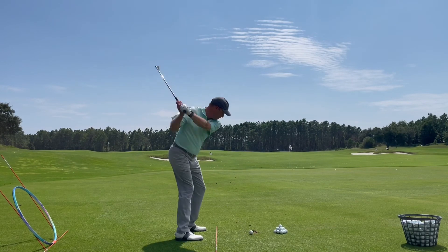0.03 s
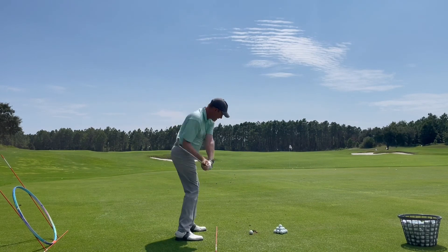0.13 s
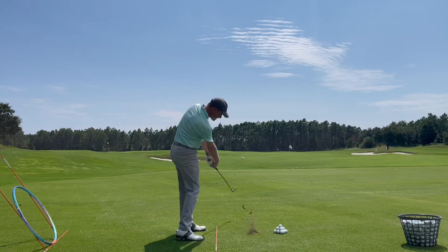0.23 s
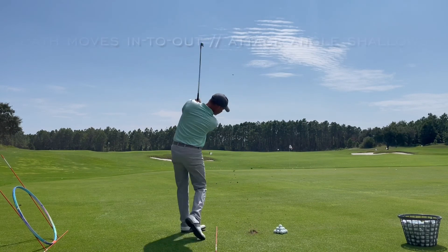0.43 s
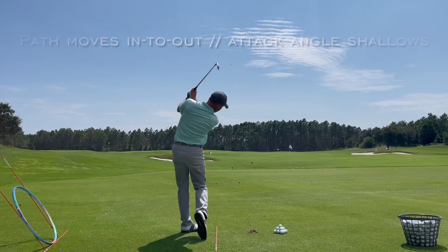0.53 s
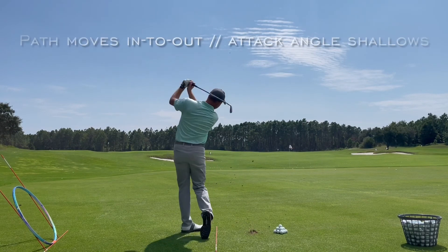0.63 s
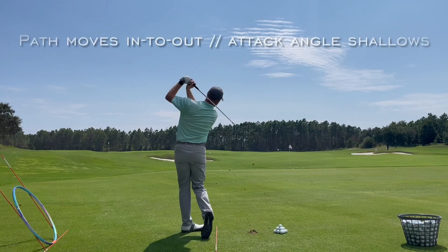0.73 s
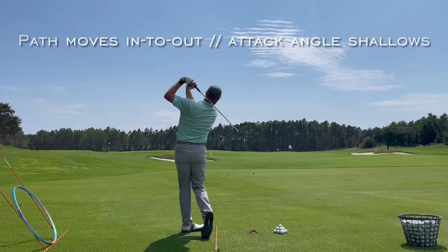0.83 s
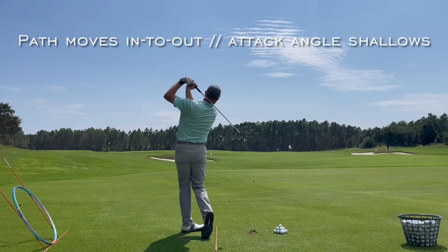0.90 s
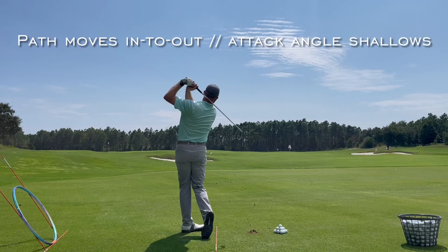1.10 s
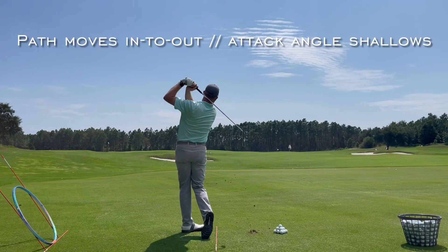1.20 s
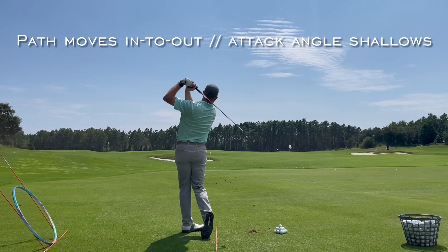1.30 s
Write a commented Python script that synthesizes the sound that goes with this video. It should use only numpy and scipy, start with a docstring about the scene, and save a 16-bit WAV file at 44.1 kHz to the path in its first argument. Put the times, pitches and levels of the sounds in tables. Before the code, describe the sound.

A golf iron hits a ball: a brief airy swish with a rising whistle swells from about 0.12 s into one loud, sharp crack at 0.21 s, with crunching turf and a short low thump. Grainy soil sprays until 0.3 s, and soft echoes fade across the open field. Low wind rumble and hiss continue, with faint cricket pulses, tiny bird chirps near 1 s and a faint tick at 1.33 s.

```python
"""Golf shot on an open range

A golf iron swishes down as shaped noise with a rising whistle, and cracks a ball off the turf: pulses,
short resonances and a burst of crunch. A sagging low tone thumps, grainy puffs of grass and soil spray,
and noise fading band by band, with soft echoes, is the open field. Wind rumbles on the microphone under
distant hiss; a cricket pulses as bursts of noise, far birds are gliding tones, and one faint tick ends it."""
import sys
import numpy as np
from scipy import signal
from scipy.fft import rfft, irfft
from scipy.io import wavfile

SR = 44100
rng = np.random.default_rng(int(sys.argv[2]) if len(sys.argv) > 2 else 0)


def materialize(psi):
    """Save the field psi as 16-bit PCM at rate SR to the path in sys.argv[1].

    A 1-D psi becomes a single channel; in a 2-D psi each row is a channel.
    """
    bounded = np.clip(np.atleast_2d(psi).T, -1, 1)
    quanta = np.round(bounded * 32767).astype(np.int16)
    wavfile.write(sys.argv[1], SR, quanta)


N = 59535
T = np.arange(N) / SR
HZ = np.fft.rfftfreq(N, 1 / SR)
IMPACT_S = .2101
SWING_FULL_S = .17  # when the swish is full at 1 kHz

# Likeness of the two channels for sound from all around, ahead of the ports.
# Each row: frequency in Hz, likeness from 0 to 1.
SURROUND_LIKENESS = [(130, 0.48), (450, 0.19), (1100, 0.082), (1900, 0.94), (5500, 0.36), (7500, 1),
                     (16000, 0.97)]
# Colour of the crack coming back off the open ground. Each row: frequency in Hz, relative level in dB per Hz.
FIELD_COLOUR = [(120, 12.5), (250, 5.5), (500, 1), (1200, -3.5), (2500, -5), (6500, -5.5), (8500, -8.5),
                (11500, -11.5), (14000, -18.5), (16000, -26)]


def amp(db):
    """Decibels to gain."""
    return 10 ** (np.asarray(db) / 20)


def unit(x):
    """Scales to rms 1."""
    return x / np.sqrt(np.mean(x ** 2) + 1e-20)


def read(points, hz):
    """Joins points by straight lines over log frequency."""
    f, value = np.transpose(points)
    return np.interp(np.log(hz + 1), np.log(f + 1), value)


def noise(spectrum, likeness):
    """Two channels of coloured noise, rms 1, as alike as the likeness table says."""
    shared, apart = rfft(rng.standard_normal((2, N)))
    c = np.clip(read(likeness, HZ), 0, 1)
    pair = np.sqrt(1 + c) * shared + np.sqrt(1 - c) * np.array([apart, -apart])
    return unit(irfft(pair * amp(read(spectrum, HZ)), N))


def drift(seconds):
    """Random wander of rms 1; more seconds make it slower."""
    return unit(irfft(rfft(rng.standard_normal(N)) * np.exp(-(HZ * seconds) ** 2), N))


def strike(start, rise, t60):
    """Envelope of a quick rise and an exponential fall of 60 dB in t60 seconds."""
    age = np.maximum(T - start, 0)
    return (1 - np.exp(-age / rise)) * amp(-60 * age / t60)


def swell(s, db, half):
    """Envelope of a smooth rise and fall."""
    return amp(db) * np.exp(-((T - s) / half) ** 2)


def by_band(x, envelope):
    """Splits sound into overlapping bands and gives each its own envelope(centre Hz)."""
    centres = np.geomspace(125, 16000, 8)
    spectrum = rfft(x)
    total = 0
    for hz, share in zip(centres, np.eye(len(centres))):
        weight = read(list(zip(centres, share)), HZ)
        total = total + irfft(spectrum * weight, N) * envelope(hz)
    return total


def ports(x):
    """Sound reaches the two microphone ports with different phase and level."""
    # Each row: frequency in Hz, lead of left over right in radians.
    port_phase = [(100, 0), (400, -.2), (750, .3), (1600, .25), (2400, .6), (5100, .4), (6700, -1.1),
                  (8150, -3.14), (11400, -6.28), (14300, -9), (16500, -9.8)]
    # Each row: frequency in Hz, left minus right in dB.
    port_balance = [(110, -1.5), (200, -2), (400, 2), (720, -3), (1200, 2), (1600, 0), (4400, 3),
                    (8100, .4), (15000, -.5)]
    phase, balance = read(port_phase, HZ), read(port_balance, HZ)
    left = amp(balance / 2) * np.exp(.5j * phase)
    right = amp(-balance / 2) * np.exp(-.5j * phase)
    return irfft(rfft(x) * np.array([left, right]), N)


def outdoors():
    """Gusty wind rumble, stronger on the right, under the slowly wandering hiss of distant trees."""
    # Colour of the rumble. Each row: frequency in Hz, relative level in dB per Hz.
    wind_colour = [(15, -28.5), (30, -13), (50, -3), (80, -0.5), (135, -3.5), (200, -9), (300, -24.5),
                   (600, -43), (2000, -70.5)]
    # Course of the rumble. Each row: time in seconds, level in dB before the trim and gusts.
    wind_course = [(0.0, -60), (0.124, -51.5), (0.15, -56.5), (0.24, -50.5), (0.326, -52.5), (0.365, -47),
                   (0.44, -53.5), (.65, -54.5), (.75, -53.5), (0.935, -54.5), (0.972, -50), (1.01, -55.5),
                   (1.17, -56.5), (1.21, -54), (1.35, -56)]
    # Colour of the hiss. Each row: frequency in Hz, relative level in dB per Hz.
    air_colour = [(100, 1), (400, 0.5), (900, -3.5), (1600, -18), (2500, -14.5), (4000, -13.5), (5300, -16),
                  (7000, -15), (8500, -13.5), (9800, -23), (11500, -35.5), (16000, -40)]
    # Course of the hiss. Each row: time in seconds, level in dB before wander and balance.
    air_course = [(0, -63.5), (.3, -62.5), (.75, -64), (.92, -64.5), (1.02, -65.5), (1.1, -63.5),
                  (1.18, -65), (1.27, -64.5), (1.35, -63.5)]
    wind_trim_db, gust_db, wind_likeness = 3.5, 0.34, 0.62
    air_wander_db = 1.15
    wind_right_db, air_right_db = 4, -1.1  # right minus left

    wind_db = wind_trim_db + np.interp(T, *np.transpose(wind_course)) + gust_db * drift(.08)
    wind = amp(wind_db) * noise(wind_colour, [(0, wind_likeness)])
    air_db = np.interp(T, *np.transpose(air_course))
    # each band of the hiss wanders by itself
    air = by_band(noise(air_colour, SURROUND_LIKENESS), lambda hz: amp(air_db + air_wander_db * drift(0.2)))
    side = np.array([[-.5], [.5]])  # left, right
    return wind * amp(side * wind_right_db) + ports(air) * amp(side * air_right_db)


def swing(hz):
    """Level of the air noise: swells with club speed, treble last, and stops at the ball."""
    rise_s, stop_s = .026, 0.0095
    lag_s = .006  # each octave above 1 kHz swells this much later
    early = np.maximum(SWING_FULL_S + lag_s * np.log2(hz / 1000) - T, 0)
    return np.exp(-(early / rise_s) ** 2 - np.maximum(T - IMPACT_S, 0) / stop_s)


def swish():
    """Turbulence round the head and a rising vortex tone from the shaft."""
    # Colour of the turbulence. Each row: frequency in Hz, relative level in dB per Hz.
    swish_colour = [(100, -22), (280, -8), (450, 0.5), (900, -2), (1600, -4.5), (2500, -5), (3500, -9.5),
                    (6000, -11.5), (7400, -16), (9500, -17.5), (11500, -21.5), (14000, -26.5), (16000, -28)]
    # Likeness of the channels for sound from the tee. Each row: frequency in Hz, likeness from 0 to 1.
    tee_likeness = [(200, .8), (900, .9), (2000, .9), (5500, 0), (7500, 0.94), (16000, 0.98)]
    swish_db, whistle_db = -43, -45.5
    whistle_hz, rise_hz_per_s = 483.8, 3200  # pitch at full swing and its climb
    waver_hz = 35  # rms

    turbulence = by_band(noise(swish_colour, tee_likeness), swing)
    pitch = whistle_hz + rise_hz_per_s * np.clip(T - SWING_FULL_S, -.1, .1)
    tone = np.sin(2 * np.pi * np.cumsum(pitch + waver_hz * drift(0.0036)) / SR)
    return amp(swish_db) * turbulence + amp(whistle_db) * tone * swing(whistle_hz)


def contact(start, db, hz, octaves):
    """One short pressure pulse: a band round its centre, with energy packed early by minimum phase."""
    f = abs(np.fft.fftfreq(2048, 1 / SR)) + 1
    log_gain = np.maximum(2 * (1 - np.hypot(1, np.log2(f / hz) / octaves)), -10)
    pulse = np.fft.ifft(np.exp(np.conj(signal.hilbert(log_gain)))).real
    spectrum = rfft(pulse / np.linalg.norm(pulse), N)
    delay = np.exp(-2j * np.pi * HZ * start)
    return amp(db) * irfft(spectrum * delay, N)


def mode(hz, db, t60):
    """One resonance that swells while the club bites and then dies in hundredths of a second."""
    peak_s, rise_s = .21175, 0.0017
    centre_hz, lag_s = 1610, .00057  # each octave below the centre peaks this much later
    age = T - peak_s - lag_s * np.log2(centre_hz / hz)
    envelope = np.exp(np.minimum(age, 0) / rise_s) * amp(db - 60 * np.maximum(age, 0) / t60)
    return envelope * np.cos(2 * np.pi * hz * age)


def crack():
    """Contact pulses, the brief ring of head, ball and ground, and the crunch of cut turf."""
    # The club meets grass, ball and ground.
    # Each row: start in seconds, level in dB, centre in Hz, width in octaves.
    club_contacts = [(.20723, -10, 896, 0.41), (.20869, -14.5, 2570, 1.4), (.21006, 2, 10600, 0.48),
                     (.21065, -7.5, 7100, 0.86), (.21073, -6, 2160, 0.31), (.21225, -1.5, 5430, 0.69),
                     (.21292, -15, 3440, .37)]
    # Ring of club head, ball and ground. Each row: frequency in Hz, level in dB, fall by 60 dB in seconds.
    ring_modes = [(265, -32.5, .046), (302, -31, .026), (395, -25, 0.033), (472, -32.8, .042),
                  (735, -16.5, 0.016), (1051, -32.2, .04), (1237, -19, .014), (1411, -27.5, .027),
                  (1594, -16, 0.014), (1852, -27, 0.0067), (2118, -26, 0.024), (2790, -26, .018),
                  (3053, -39, 0.046), (3590, -23, .007), (5400, -32.5, 0.026), (6130, -34.4, 0.016),
                  (6480, -32, .024), (6840, -27, 0.016)]
    # Colour of the crunch. Each row: frequency in Hz, relative level in dB per Hz.
    crunch_colour = [(150, -6), (300, -1), (520, -2), (900, -6.5), (1400, -0.5), (3000, -5), (6500, -7),
                     (8200, -10), (11500, -9.5), (16000, -17.5)]
    pulses = sum(contact(*row) for row in club_contacts)
    ring = sum(mode(*row) for row in ring_modes)
    crunch = noise(crunch_colour, SURROUND_LIKENESS) * strike(IMPACT_S, rise=.0008, t60=0.027)
    return pulses + ring + amp(-18.5) * crunch


def echo(s, db, half, hz, octaves):
    """A smeared return of the crack: one band of noise that swells and fades."""
    band = np.exp(-(np.log2((HZ + 1) / hz) / octaves) ** 2)
    return unit(irfft(rfft(noise(FIELD_COLOUR, SURROUND_LIKENESS)) * band, N)) * swell(s, db, half)


def field():
    """The crack scatters back from the open ground, middle bands lasting longest, with soft echoes."""
    # Dying away over the field. Each row: frequency in Hz, fall by 60 dB in seconds.
    field_decay = [(200, 0.71), (700, 1.6), (2500, 1.06), (6500, .8), (12000, 0.65)]
    # Returns from the edges of the range.
    # Each row: time in seconds, level in dB, half length in seconds, centre in Hz, width in octaves.
    edge_echoes = [(0.336, -60, 0.015, 2110, 0.43), (0.356, -63, 0.014, 990, 0.78)]
    tail = by_band(noise(FIELD_COLOUR, SURROUND_LIKENESS),
                   lambda hz: strike(IMPACT_S, rise=0.0088, t60=read(field_decay, hz)))
    return amp(-47) * tail + sum(echo(*row) for row in edge_echoes)


def thump():
    """The sole digs in and the ground answers with a low, damped swing that sags in pitch."""
    start_s, level_db = .2156, -29
    start_hz, end_hz, sag_s = 258, 122, 0.0051  # the pitch drops as the turf gives way
    age = np.maximum(T - start_s, 0)
    turns = end_hz * age + (start_hz - end_hz) * sag_s * (1 - np.exp(-age / sag_s))
    return amp(level_db) * strike(start_s, rise=.0039, t60=0.13) * np.sin(2 * np.pi * turns)


def spray():
    """Grainy puffs of grass and soil fly off the divot: noise with a fast random flutter of level."""
    # Colour of the puffs. Each row: frequency in Hz, relative level in dB per Hz.
    spray_colour = [(150, -9), (500, -3), (1500, -0.5), (3500, 2), (6500, -1), (8500, -8), (11500, -11),
                    (14000, -15), (16000, -24)]
    # Each row: time in seconds, level in dB, half length in seconds.
    puffs = [(0.24, -52, .012), (0.26, -50, .015), (0.275, -50.5, .014), (0.301, -58.5, .025)]
    grains = unit(amp(2.5 * drift(.0008)))  # 2.5 dB rms
    return noise(spray_colour, SURROUND_LIKENESS) * grains * sum(swell(*row) for row in puffs)


def cricket():
    """Soft, evenly spaced pulses of high rasp from noise."""
    # Colour of the rasp. Each row: frequency in Hz, relative level in dB per Hz.
    rasp_colour = [(5500, -41), (6400, -1.5), (7000, 5), (8200, 0), (9500, 2.5), (10600, -11.5),
                   (12000, -27), (15000, -39)]
    # Each row: time in seconds, level in dB, half length in seconds.
    pulses = [(0.417, -63, 0.055), (0.668, -63, 0.053), (0.917, -69.5, 0.059), (1.168, -67, 0.052)]
    return noise(rasp_colour, SURROUND_LIKENESS) * sum(swell(*row) for row in pulses)


def birds():
    """Thin, wavering upward glides from far away."""
    # Each row: time in seconds, level in dB, half length in seconds, pitch in Hz, glide in Hz per second.
    wisps = [(.98, -78, 0.013, 2940, 13970), (1.096, -74, 0.034, 4044, 803)]
    waver = 90 * drift(.002)  # Hz rms
    song = 0
    for s, db, half, hz, glide in wisps:
        pitch = hz + glide * (T - s) + waver
        song = song + swell(s, db, half) * np.sin(2 * np.pi * np.cumsum(pitch) / SR)
    return song


def tick():
    """One faint tick, a pulse shaped like those of the club contacts."""
    return contact(start=1.332, db=-44, hz=2020, octaves=1.1)


def scene():
    """The shot, its field, cricket, birds and tick through the ports, over the wind and hiss."""
    shot = swish() + crack() + field() + thump() + spray()
    return outdoors() + ports(shot + cricket() + birds() + tick())


def record(dry):
    """The recorder's band limit, a linear-phase low-pass at 16.7 kHz."""
    lowpass = signal.firwin(511, 16700, window=("kaiser", 9), fs=SR)
    return signal.oaconvolve(dry, lowpass[None], "same")


dry = scene()
out = record(dry)
materialize(out)
```